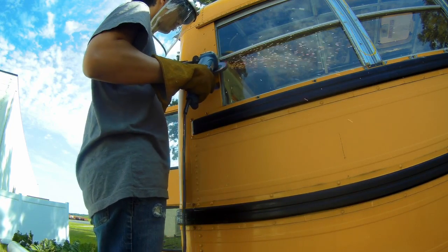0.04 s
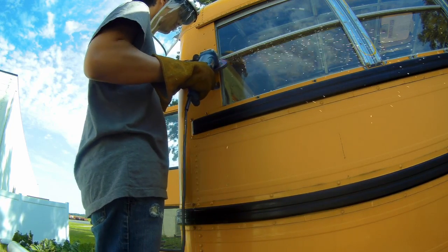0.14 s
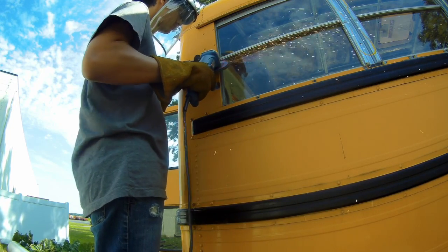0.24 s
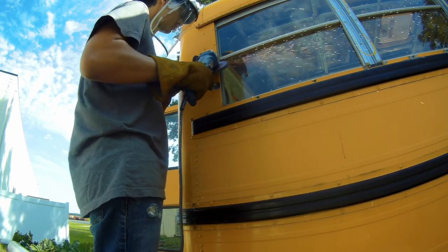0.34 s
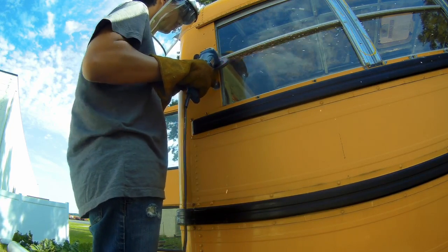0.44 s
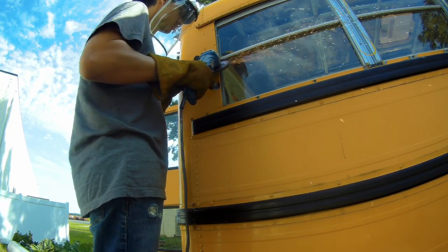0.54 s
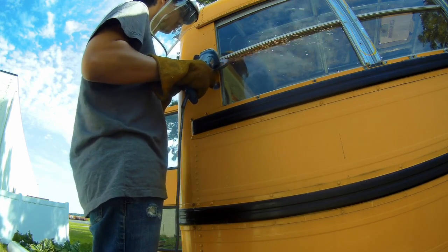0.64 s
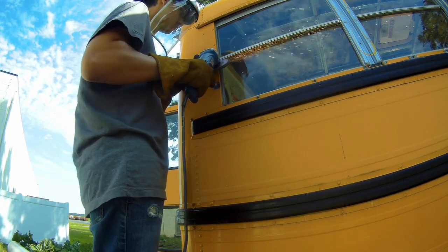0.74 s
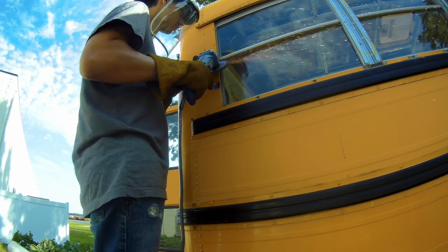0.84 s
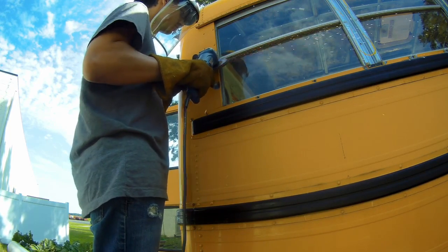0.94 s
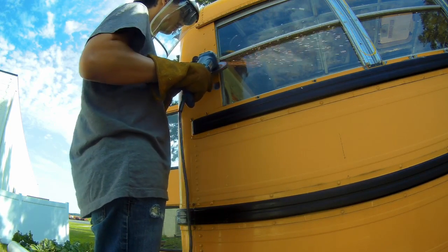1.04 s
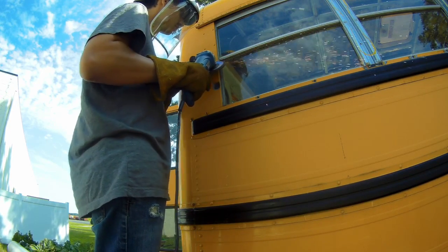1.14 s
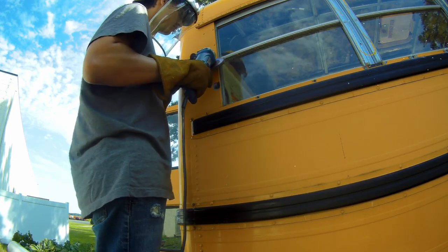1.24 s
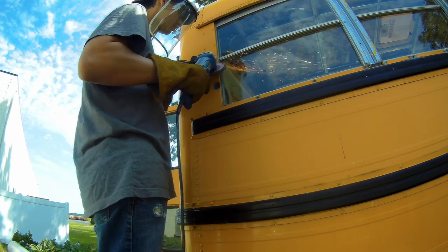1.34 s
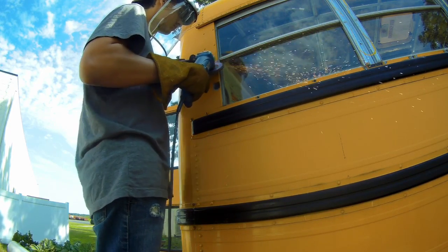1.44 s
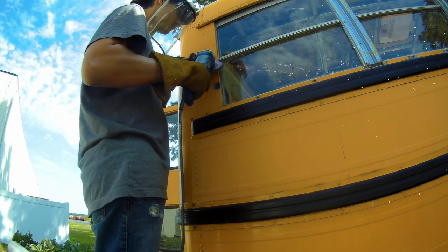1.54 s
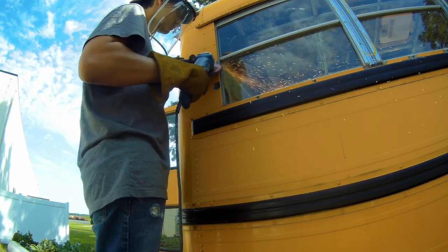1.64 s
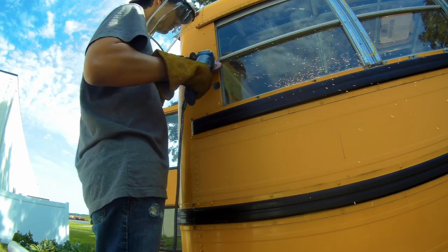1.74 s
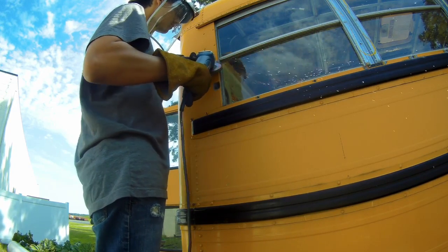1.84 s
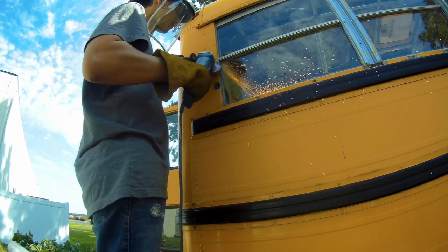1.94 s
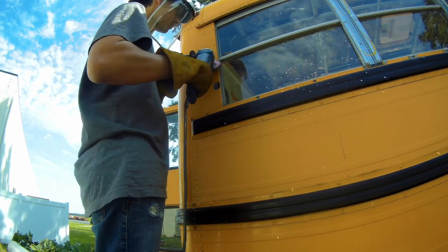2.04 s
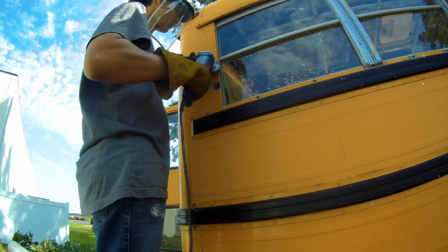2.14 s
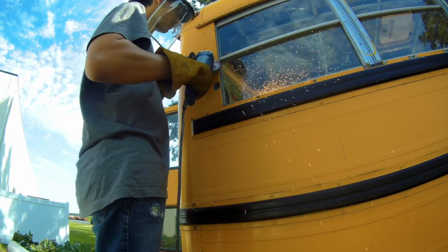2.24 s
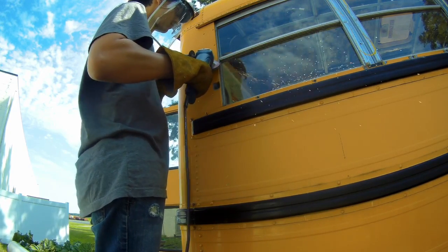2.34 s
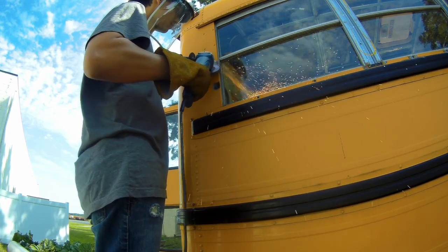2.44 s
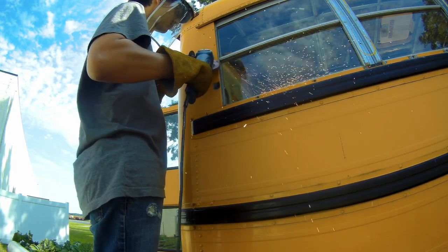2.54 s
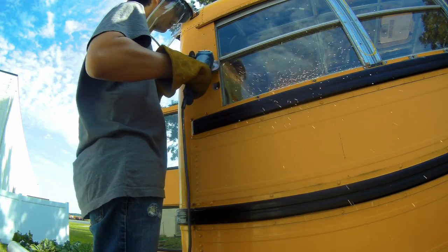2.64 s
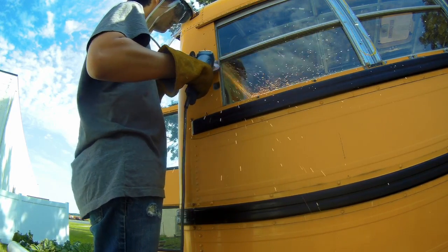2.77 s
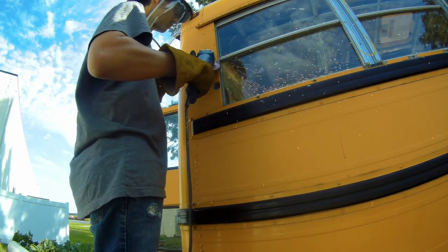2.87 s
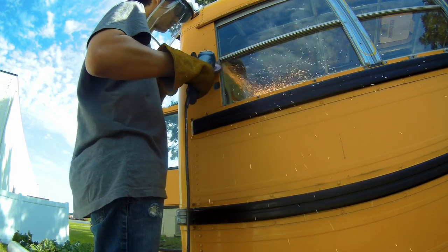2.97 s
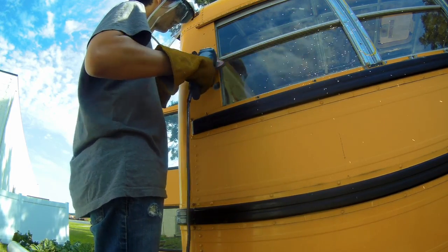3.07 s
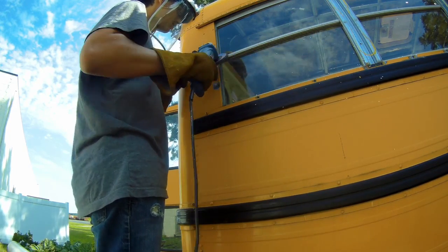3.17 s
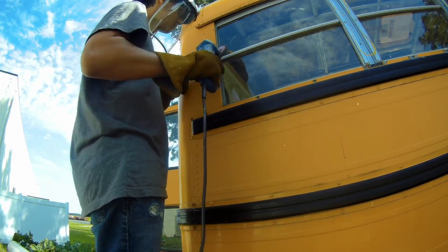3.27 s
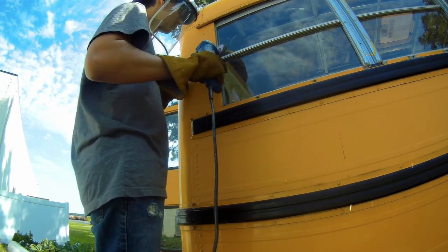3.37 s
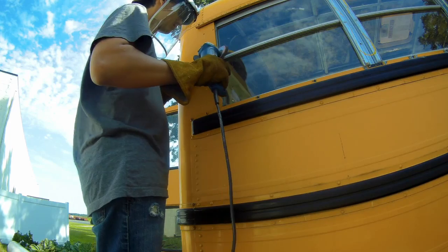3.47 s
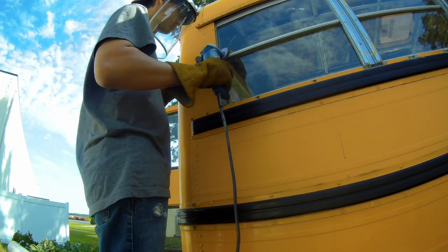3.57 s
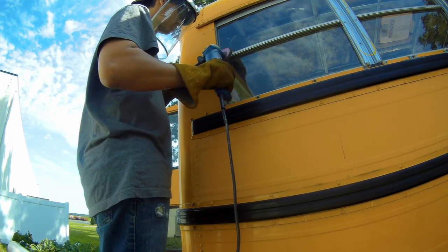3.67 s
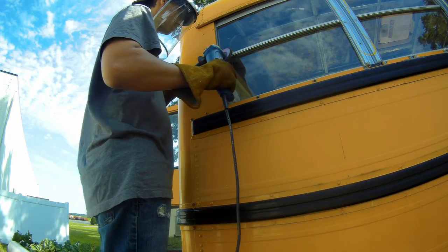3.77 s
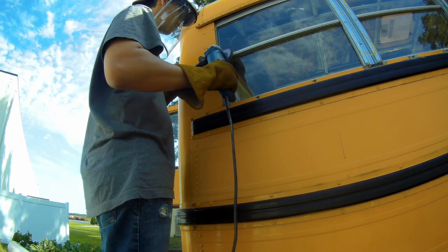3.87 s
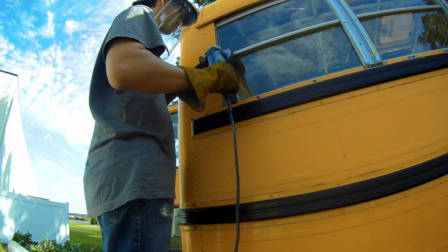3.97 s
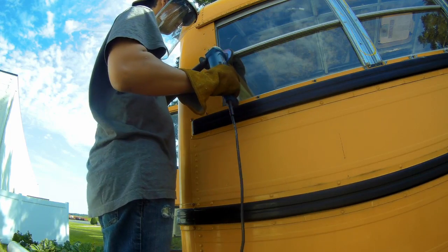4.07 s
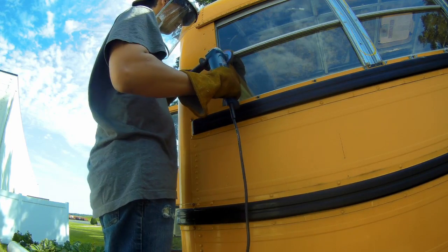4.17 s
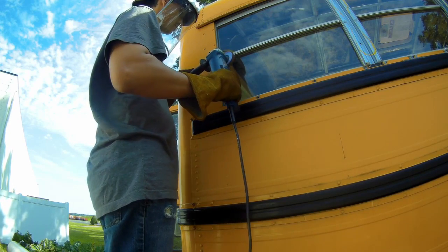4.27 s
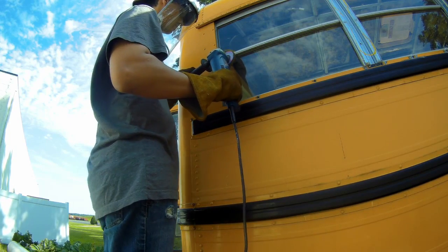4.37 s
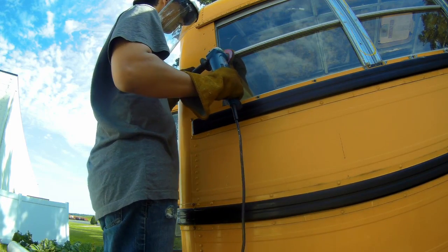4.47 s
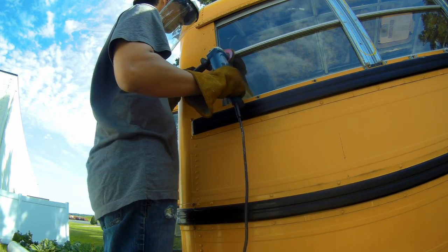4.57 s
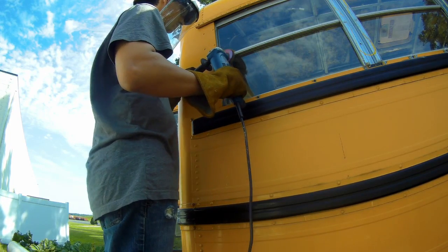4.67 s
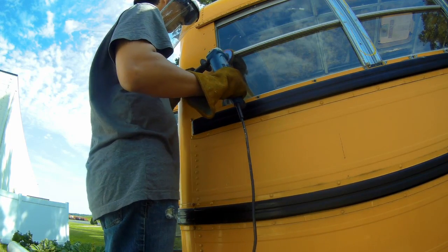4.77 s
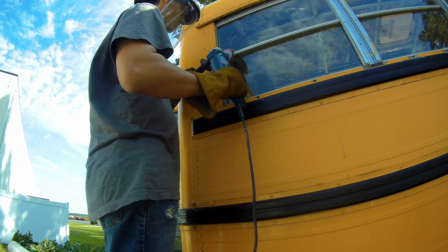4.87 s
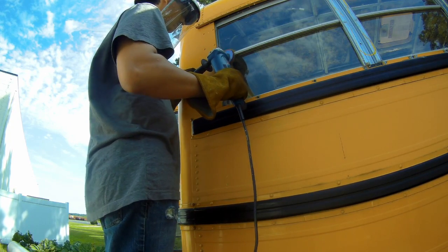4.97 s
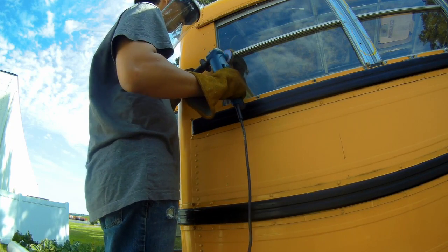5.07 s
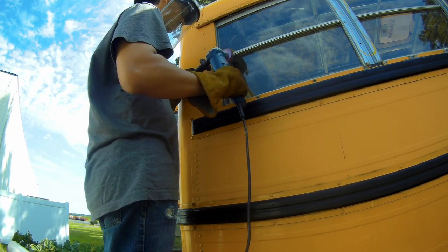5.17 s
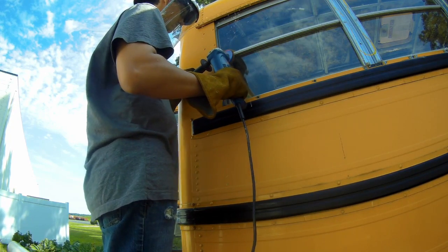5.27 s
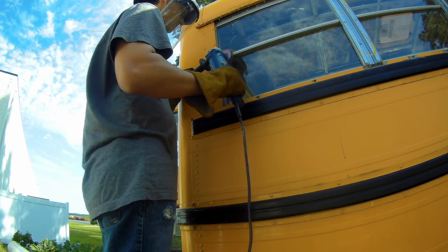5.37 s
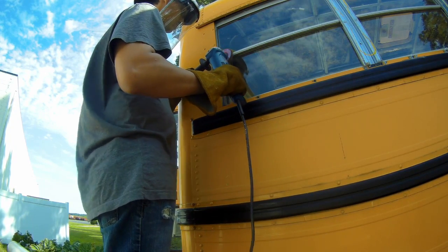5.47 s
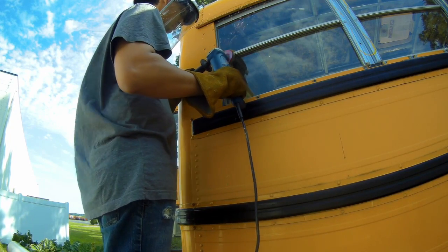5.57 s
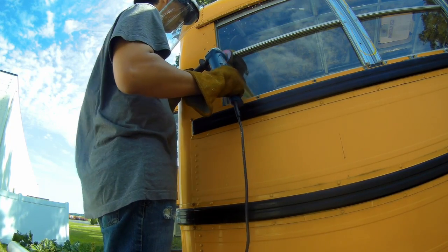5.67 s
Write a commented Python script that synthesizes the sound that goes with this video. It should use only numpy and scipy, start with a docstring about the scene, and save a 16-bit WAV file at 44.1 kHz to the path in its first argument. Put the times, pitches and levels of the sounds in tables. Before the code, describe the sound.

Outdoors, a power grinder scrapes metal steadily for three seconds, spins up freely, touches down in brief zips, and bites with a brighter rasp.

```python
"""An angle grinder bites a steel rivet outdoors, lifts and speeds up, taps the next rivet and bites again.
While it bites, the disc's rough face comes round once a turn, so the hiss repeats at disc speed;
its woven ply whistles about 104 times a turn, and the panel rumbles under the grinding.
In the air and on the taps the geared motor, near three times as fast as the disc, roars and hisses louder.
Gusts come and go and a far engine hums throughout, in mono through a resonant microphone case."""
import sys
import numpy as np
from scipy import signal
from scipy.fft import rfft, irfft, next_fast_len
from scipy.io import wavfile
from scipy.ndimage import uniform_filter1d, map_coordinates

SR = 44100
rng = np.random.default_rng(int(sys.argv[2]) if len(sys.argv) > 2 else 0)


def wrap_up_sound(samples):
    """Save the sound to the file named by the first command line argument, as 16-bit audio."""
    columns = np.atleast_2d(samples).T
    # keep every value between -1 and 1, then stretch to whole-number steps
    tamed = np.clip(columns, -1, 1)
    steps = np.round(tamed * 32767).astype(np.int16)
    wavfile.write(sys.argv[1], SR, steps)


N = 251811  # length [samples]

# Far engine: (frequency [Hz], peak level [dB])
ENGINE_HUM = [(68, -84)]
# Gusts at the microphone: (time [s], level [dB], half length [s])
GUSTS = [(1.29, -81, .03), (1.81, -85, 0.078), (2.1, -81, 0.045), (2.8, -93, .1), (4.94, -74.5, 0.085),
         (5.36, -93, .05), (5.67, -85, .07)]
# Wind buffet colour: (frequency [Hz], relative density [dB per Hz])
BUFFET_COLOUR = [(10, -25), (25, 6), (55, 2), (120, 4), (300, -60)]
CALM_DB = -92  # wind under the gusts
# Panel rumble colour: (frequency [Hz], relative density [dB per Hz])
RUMBLE_COLOUR = [(30, -1), (65, -3), (100, 2), (300, 6), (600, 4.5), (1200, -2.5), (2400, -12)]
FREE_RUMBLE_DB = -88  # rumble that stays off the work

# Disc speed on the work, where the rocking hands make it sag and recover: (time [s], speed [turns per s])
WORK_SPEED = [(0.02, 117.6), (0.2, 100.8), (0.34, 100.8), (0.48, 96.3), (0.66, 100.2), (0.87, 102),
              (0.99, 97.6), (1.08, 99.9), (1.25, 87.8), (1.38, 96.5), (1.51, 87), (1.66, 93.2),
              (1.78, 88.8), (1.94, 95.2), (2.06, 90.8), (2.21, 96.6), (2.34, 91), (2.47, 96.6),
              (2.58, 90.6), (2.73, 98.3), (2.83, 95), (2.98, 100), (3.11, 97.2), (3.92, 150), (4.3, 147.4),
              (4.5, 147), (4.68, 148.8), (4.85, 146), (5.0, 142.5), (5.16, 137), (5.3, 135), (5.42, 130),
              (5.56, 132), (5.71, 127.5)]
# Lifted off, the disc runs up towards its free speed until it meets the next rivet
LIFT_S, MEET_S = 3.11, 3.92
FREE_SPEED, RUN_UP_S = 154, 0.325  # [turns per s], time constant [s]
SPEED_JITTER = 0.25  # [turns per s]
GEARING = 38 / 13  # motor turns for each disc turn
SHAKE_DB = 0.73  # the hands shake the whole tool
# Share of power that repeats each turn, a row for each rivet: (disc hiss [0-1], gear roar [0-1], fan hiss [0-1])
REPEATS = [(.4, .22, .3), (.92, .22, .65)]

# Gear roar colour: (frequency [Hz], relative density [dB per Hz])
ROAR_COLOUR = [(140, -40), (250, -23), (420, -19.5), (600, -10.5), (850, -7.5), (1400, -5.5), (1750, -7.5),
               (2200, -3), (3000, -1), (4500, -16.5)]
ROAR_DB, ROAR_POWER = -62.5, 2.01  # level at 100 turns per s, growth as this power of speed
ROAR_BEAT_DB = -0.5  # pulse once a disc turn
LIFTED_DB, LIFTED_S = 1.5, 0.15  # the roar comes up off the first rivet: rise [dB], time constant [s]
# Fan hiss colour: (frequency [Hz], relative density [dB per Hz])
FAN_COLOUR = [(1800, -24.5), (3000, -17.5), (3350, -7.5), (3750, -3.5), (4200, -3), (5000, -1.5),
              (7000, -2.5), (10000, -5.5), (13000, -9.5), (16000, -21.5)]
FAN_DB, FAN_POWER = -56.5, 1.44  # level at 100 turns per s, growth as this power of speed
FAN_BEAT_DB, MOTOR_BEAT_DB = 1.5, 2.5  # pulses once a disc turn and once a motor turn
# Shaft tones: (time [s], disc unbalance [dB], third multiple of disc speed [dB], fifth [dB], sixth [dB],
#   seventh [dB], other multiples [dB], motor unbalance [dB], twice a motor turn [dB])
TONES = [(0.5, -98, -94, -98, -88, -92, -80, -98, -97), (1.9, -99, -94, -92, -87, -92, -79, -98, -98),
         (2.2, -98, -92, -98, -90, -82, -80, -98, -98), (2.9, -95, -91, -98, -90, -82, -80, -91, -91),
         (3.15, -98, -98, -98, -88, -92, -88, -85, -95), (3.27, -99, -98, -92, -88, -94, -84, -74, -82),
         (3.5, -85, -90, -87, -88, -92, -78, -73, -74), (3.65, -84, -84, -90, -83, -84, -76, -92, -79),
         (3.8, -77, -79, -82, -82, -82, -71, -88, -76), (4.1, -74, -79, -77, -77, -80, -73, -92, -75),
         (4.3, -75, -81, -74, -75, -76, -70, -90, -70), (4.42, -82, -82, -74, -75, -75, -70, -93, -70),
         (4.7, -80, -86, -81, -77, -79, -70, -92, -77), (5.0, -80, -85, -78, -79, -70, -69, -88, -72),
         (5.3, -81, -86, -82, -82, -80, -77, -81, -74), (5.55, -82, -88, -86, -82, -80, -84, -78, -74),
         (5.71, -87, -90, -86, -82, -82, -82, -79, -74)]
# The other multiples: (multiple of disc speed, level over their shared column [dB])
OTHER_MULTIPLES = [(2, -19), (4, -8), (8, -8), (9, -9), (10, -6)]
# Gear-tooth whine, clearest as the disc first bogs down: (time [s], level [dB])
WHINE_LEVEL = [(0, -66), (.2, -67), (.3, -73), (1.1, -74), (1.4, -80), (3.1, -80), (3.18, -92), (4.6, -88),
               (5.3, -76), (5.71, -74)]
# What passes of the teeth: (frequency [Hz], relative gain [dB])
TOOTH_COLOUR = [(2500, -20), (3300, -10), (3700, 0), (4600, 0), (5200, -8)]
TEETH = 38  # on the ring gear, per disc turn
# Ringing of the gear case: (time [s], level [dB])
GEARCASE_LEVEL = [(0, -72), (.2, -67), (.5, -67.5), (1.2, -64), (2, -68), (2.6, -65.5), (3.1, -68),
                  (3.2, -66.5), (4.6, -68), (5.3, -71), (5.71, -68)]
# Gear case resonance: (frequency [Hz], relative density [dB per Hz])
GEARCASE_RING = [(3000, -30), (3450, -9), (3600, -1), (3740, 2), (3880, -8), (4100, -14), (4600, -22.5)]
GEARCASE_BEAT_DB = 1.5  # flutter once a disc turn

# One table for each rivet: (time [s], grinding [dB], weave whistle over it [dB], panel rumble [dB])
BITES = [
    [(0.0, -45.5, -6, -70), (0.14, -43, -7, -74.5), (0.27, -45.5, -5.5, -71), (0.7, -45, -3, -73.5),
     (1.2, -47, -5, -74.5), (1.29, -49.5, 0, -75), (1.4, -44.5, -12, -74), (1.51, -47.5, -13, -76),
     (1.59, -46, -9.5, -70.5), (1.81, -46, -3, -68), (2.1, -49, -2, -71), (2.5, -47.5, -8.5, -74.5),
     (2.66, -48, -2.5, -74), (2.81, -46, -4, -73), (2.95, -47.5, -5, -74.5), (3.11, -45, -1, -65)],
    [(4.66, -40, -12, -97), (4.714, -49, -17, -90), (4.75, -44.5, -12, -84), (5.01, -42.5, -9, -69),
     (5.152, -45, -11, -85), (5.206, -48.5, -4, -95), (5.356, -44, -10, -84), (5.46, -47, -8, -88),
     (5.495, -57.5, -5, -89), (5.55, -45, -8, -87), (5.6, -41, -8, -78), (5.71, -39.5, -17, -70)],
]
# Short touches on the next rivet: (time [s], level [dB], half length [s])
TAPS = [(3.956, -45.5, 0.017), (4.061, -44.5, 0.018), (4.17, -44, 0.029), (4.258, -43, 0.02),
        (4.331, -42.5, 0.03), (4.428, -42.5, 0.029)]
ATTACK_S, RELEASE_DB_PER_S = 0.03, 453  # the disc lands, and lets go
# How the disc sits on the work: (time [s], low rasp over the grit [dB], rivet ring over the grit [dB])
SEATS = [(0, -35, -8), (.3, -40, -16), (1.4, -35, -12), (2, -30, -5.5), (2.5, -46, -11.5), (3.11, -32, -3),
         (3.9, -9, -7), (4.5, -14.5, -11), (5, -11.5, -3), (5.2, -8, -5), (5.35, -7.5, -2.5), (5.5, -9, -6),
         (5.71, -12.5, -8)]
# Grit on steel: (frequency [Hz], relative density [dB per Hz])
GRIT_COLOUR = [(4000, -32.5), (5200, -15), (6000, -12.5), (6800, -5.5), (7400, -2.5), (8200, -6.5),
               (9300, -4.5), (10200, -5.5), (11500, -4), (13200, -7), (15100, -4.5), (16000, -4.5)]
# Low rasp of sheet steel: (frequency [Hz], relative density [dB per Hz])
RASP_COLOUR = [(500, -49), (1500, -15), (2800, -21), (3400, 4.5), (4000, -1), (4700, 6.5), (5400, 4),
               (6200, 4), (7500, -45), (10000, -45)]
# Rivet and disc ring: (frequency [Hz], relative density [dB per Hz])
RING_COLOUR = [(7000, -68), (8400, -13.5), (9000, -6), (9450, -7), (9800, -5.5), (10400, -17), (12000, -45)]
WEAVE = 103.7  # weave crossings round the disc
CELLS = 512  # points round one turn

# Microphone case colour: (frequency [Hz], gain [dB])
MIC_CASE = [(2300, 0.5), (2950, -8.5), (3750, 0), (4400, -4), (5100, -6.5), (6400, 2.5), (7400, -0.5),
            (8000, -1.5), (9200, 4.5), (11000, -2.5), (14000, -2), (15600, 3)]
SQUEEZE = 0.031  # amplitude that squeezed peaks approach
TOP_HZ = 15760  # band limit


def amp(db):
    """Decibels to amplitude."""
    return 10 ** (np.asarray(db) / 20)


def unit(x):
    """Scale to an RMS of one."""
    return x / np.sqrt(np.mean(x ** 2) + 1e-20)


def along(points, hz):
    """Read (frequency [Hz], value) points on a log frequency axis."""
    f, v = np.transpose(points)
    return np.interp(np.log(hz + 1), np.log(f + 1), v)


def curves(rows):
    """One value per sample for each column after the time."""
    s, *columns = np.transpose(rows)
    return [np.interp(np.arange(N) / SR, s, column) for column in columns]


def swells(rows):
    """Sum of bell-shaped swells, each 5.4 dB down at its half length."""
    t = np.arange(N) / SR
    return sum(amp(db - 5.4 * ((t - s) / half) ** 2) for s, db, half in rows)


def wobble(rate):
    """A smooth random curve with rate knots a second."""
    knots = rng.standard_normal(int(N * rate / SR) + 4)
    return map_coordinates(knots, [np.arange(N) * rate / SR])


def filtered(x, response, rate=SR):
    """Apply a gain that depends on frequency."""
    m = next_fast_len(x.shape[-1] + 8192)
    spectrum = rfft(x, m) * response(np.fft.rfftfreq(m, 1 / rate))
    return irfft(spectrum, m)[..., :x.shape[-1]]


def coloured(x, colour):
    """Shape the spectrum, then bring the RMS to one."""
    return unit(filtered(x, lambda hz: amp(along(colour, hz))))


def patchy(x, depth_db, size=(8, 6)):
    """Random louder and softer patches, size cells across in pitch and time."""
    z = signal.stft(x, nperseg=512)[2]
    field = uniform_filter1d(rng.standard_normal(z.shape), size[0], 0)
    field = uniform_filter1d(field, size[1], 1)
    return signal.istft(z * amp(depth_db * unit(field)), nperseg=512)[1][:N]


def per_rivet(rows):
    """Each column passes from its first-rivet to its second-rivet value while the disc is in the air."""
    return curves([(LIFT_S, *rows[0]), (MEET_S, *rows[1])])


def disc_face(turns, memory, order_gain, steady):
    """Roughness round a turning part, worn a little each turn and read at the contact."""
    fresh = rng.standard_normal((2, 900, CELLS))
    worn = signal.lfilter([1], [1, -memory], fresh[0], axis=0)
    lengths = rfft(worn)
    # even out the bump lengths so that none stands far above the others
    worn = irfft(lengths / (np.abs(lengths) + 1e-9) ** 0.45)
    # frequency along a face is counted in cycles per turn
    faces = [unit(filtered(f.ravel(), order_gain, CELLS)) for f in (worn, fresh[1])]
    repeating, new = [map_coordinates(f, [(turns + 30) * CELLS]) for f in faces]
    return np.sqrt(steady) * repeating + np.sqrt(1 - steady) * new


def broad(order):
    """Keep all roughness below 190 cycles a turn."""
    return order < 190


def around(centre, width):
    """Resonance-shaped gain that picks out one count of cycles per turn."""
    return lambda order: 1 / (1 + ((order - centre) / width) ** 2)


def disc_speed():
    """Turns per second: sagging under load, running up exponentially in the air."""
    t = np.arange(N) / SR
    speed = curves(WORK_SPEED)[0]
    shortfall = FREE_SPEED - speed[round(LIFT_S * SR)]
    free = FREE_SPEED - shortfall * np.exp(-(t - LIFT_S) / RUN_UP_S)
    speed = np.where((t > LIFT_S) & (t < MEET_S), free, speed)
    speed = uniform_filter1d(speed, size=1200, mode="nearest")
    return speed + SPEED_JITTER * wobble(16)


def contact():
    """Strength of grinding, weave whistle and panel rumble as the disc lands and lets go."""
    t = np.arange(N) / SR
    bite, weave, shake = swells(TAPS), 0, amp(FREE_RUMBLE_DB)
    for rows in BITES:
        level_db, weave_db, rumble_db = curves(rows)
        landing = np.clip((t - rows[0][0]) / ATTACK_S + 1, 0, 1) ** 2
        release = amp(-RELEASE_DB_PER_S * np.maximum(t - rows[-1][0], 0))
        on = landing * release
        bite = bite + on * amp(level_db)
        weave = weave + on * amp(level_db + weave_db)
        shake = shake + on * amp(rumble_db)
    return bite, weave, shake


def far_engine():
    """A low sine whose level and phase wander gently."""
    hz, db = ENGINE_HUM[0]
    phase = 2 * np.pi * hz * np.arange(N) / SR + 0.12 * wobble(4.3)
    return amp(db + 1.1 * wobble(4.0)) * np.sin(phase)


def wind():
    """Low noise at the microphone, swelling with each gust."""
    strength = (swells(GUSTS) + amp(CALM_DB)) * amp(2.5 * wobble(7.9))
    return strength * coloured(rng.standard_normal(N), BUFFET_COLOUR)


def panel_rumble(shake):
    """Low noise of the panel, driven by the grinding."""
    return shake * amp(1.2 * wobble(16)) * coloured(rng.standard_normal(N), RUMBLE_COLOUR)


def motor_texture(turns, steady):
    """Noise that partly repeats each disc turn, with broad and narrow patches."""
    noise = disc_face(turns, 0.9, broad, steady)
    return patchy(patchy(noise, depth_db=1.23), depth_db=1.52, size=(2, 9))


def gear_roar(turns, faster_db, beat):
    """Rough noise of the gears that grows with speed and comes up off the first rivet."""
    lifted = 1 - np.exp(-np.maximum(np.arange(N) / SR - LIFT_S, 0) / LIFTED_S)
    rattle = motor_texture(turns, per_rivet(REPEATS)[1])
    level_db = ROAR_DB + ROAR_POWER * faster_db + LIFTED_DB * lifted + ROAR_BEAT_DB * beat
    return amp(level_db) * coloured(rattle, ROAR_COLOUR)


def fan_hiss(turns, faster_db, beat):
    """Air noise that grows with speed and pulses with both the disc and the motor."""
    air = motor_texture(turns, per_rivet(REPEATS)[2])
    motor_beat = np.cos(2 * np.pi * GEARING * turns)
    level_db = FAN_DB + FAN_POWER * faster_db + FAN_BEAT_DB * beat + MOTOR_BEAT_DB * motor_beat
    return amp(level_db + 1.13 * wobble(120)) * coloured(air, FAN_COLOUR)


def shaft_tones(turns):
    """Unsteady sines locked to multiples of the disc and motor speeds."""
    def tone(k):
        """A sine of unit RMS at k cycles a disc turn; its phase wanders more at higher multiples."""
        phase = 2 * np.pi * k * turns + 0.36 * k ** 0.5 * wobble(14) + k * k
        return np.sqrt(2) * np.sin(phase)

    *disc_db, higher_db, motor_db, twice_db = curves(TONES)
    multiples = (1, 3, 5, 6, 7, GEARING, 2 * GEARING)
    levels_db = (*disc_db, motor_db, twice_db)
    tones = sum(amp(db) * tone(k) for k, db in zip(multiples, levels_db))
    tones += sum(amp(higher_db + db + 1.0 * wobble(2.47)) * tone(k) for k, db in OTHER_MULTIPLES)
    return tones


def gear_teeth(turns, beat):
    """Whine at the tooth rate, with broad chatter ringing the gear case."""
    chatter = disc_face(turns, 0.85, broad, 0.45)
    mesh = disc_face(turns, 0.8, around(TEETH, 0.7), 0.6)
    whine = amp(curves(WHINE_LEVEL)[0]) * coloured(mesh, TOOTH_COLOUR)
    case_db = curves(GEARCASE_LEVEL)[0] + GEARCASE_BEAT_DB * beat
    ringing = amp(case_db) * coloured(chatter, GEARCASE_RING)
    return amp(1.6 * wobble(29.77)) * (whine + ringing)


def motor(turns, speed):
    """Roar, hiss, shaft tones and tooth whine, all driven by the same turning shafts."""
    faster_db = 20 * np.log10(speed / 100)
    beat = np.cos(2 * np.pi * turns)
    noise = gear_roar(turns, faster_db, beat) + fan_hiss(turns, faster_db, beat)
    return noise + shaft_tones(turns) + gear_teeth(turns, beat)


def grinding(turns, bite, weave):
    """Grit and weave tear the steel and ring the rivet, pulsing with the disc."""
    steady = per_rivet(REPEATS)[0]
    grit = patchy(disc_face(turns, 0.94, broad, steady), depth_db=0.5)
    # narrow random patches make the grit uneven in pitch and time
    grit = patchy(grit, depth_db=3.2, size=(2, 9))
    ply = disc_face(turns, 0.8, around(WEAVE, 1.15), steady)
    rasp_db, ring_db = curves(SEATS)
    steel = coloured(grit, GRIT_COLOUR)
    steel = steel + amp(rasp_db + 1.4 * wobble(9.6)) * coloured(grit, RASP_COLOUR)
    steel = steel + amp(ring_db) * coloured(grit, RING_COLOUR)
    # the disc runs slightly out of true: pressure beats once and twice a turn
    beat_db = 0.5 * np.cos(2 * np.pi * turns) + 0.33 * np.cos(4 * np.pi * turns + 1)
    # the hands shake: slow to fast wander
    unsteady_db = 0.51 * wobble(9) + 0.29 * wobble(27) + 0.21 * wobble(300)
    whistle = weave * amp(1.15 * wobble(14)) * ply
    return amp(beat_db + unsteady_db) * (bite * steel + whistle)


def scene():
    """All sources, alike in both channels."""
    speed = disc_speed()
    turns = np.cumsum(speed) / SR
    bite, weave, shake = contact()
    hands = amp(SHAKE_DB * wobble(18))
    background = far_engine() + wind() + panel_rumble(hands * shake)
    tool = hands * (motor(turns, speed) + grinding(turns, bite, weave))
    return np.tile(background + tool, (2, 1))


def record(dry):
    """The microphone case colours the sound, peaks are softly squeezed, and the top is cut."""
    x = filtered(dry, lambda hz: amp(along(MIC_CASE, hz)))
    x = x / (1 + np.abs(x / SQUEEZE) ** 3) ** (1 / 3)
    return filtered(x, lambda hz: hz < TOP_HZ)


dry = scene()
out = record(dry)
wrap_up_sound(out)
```